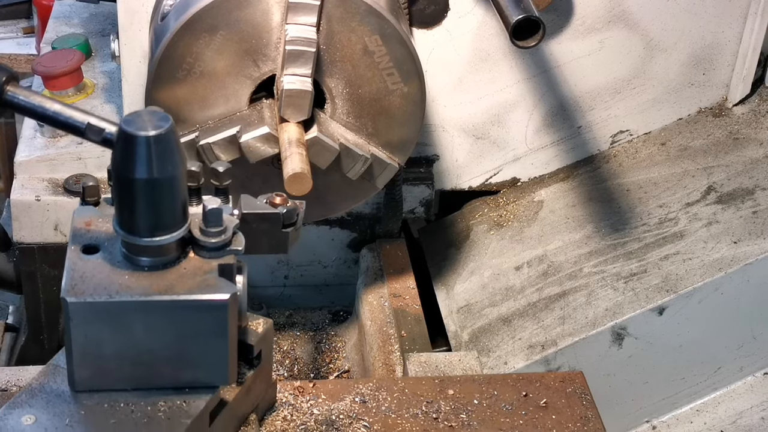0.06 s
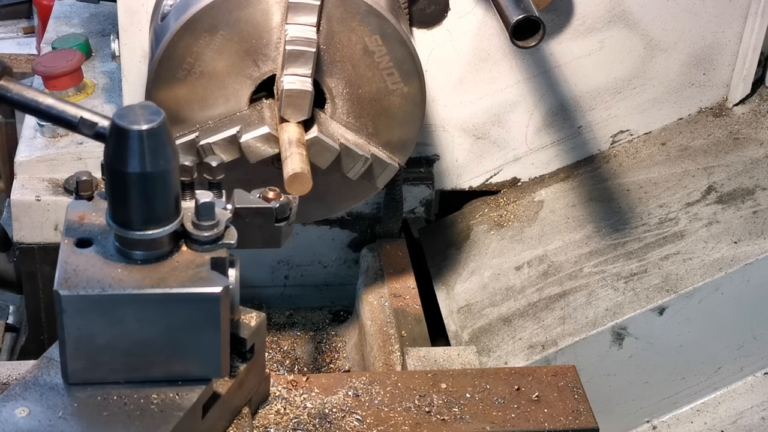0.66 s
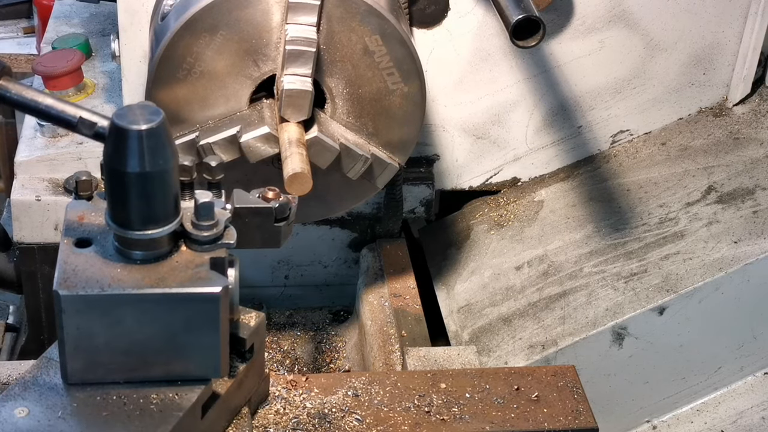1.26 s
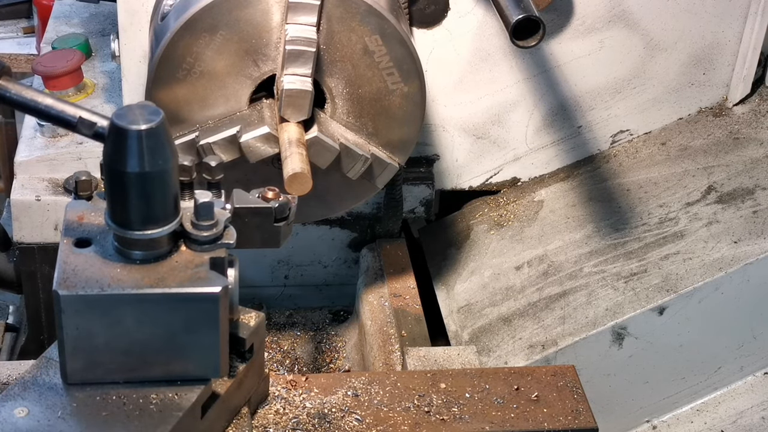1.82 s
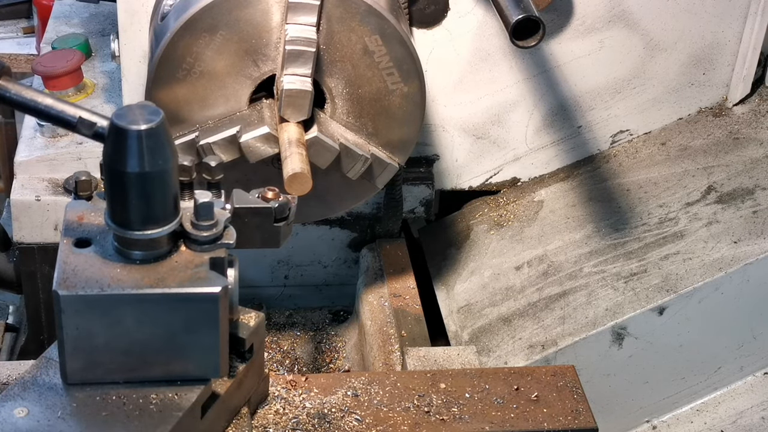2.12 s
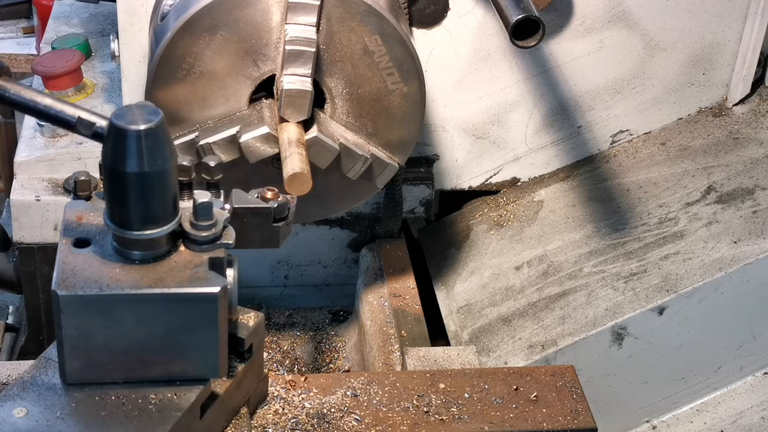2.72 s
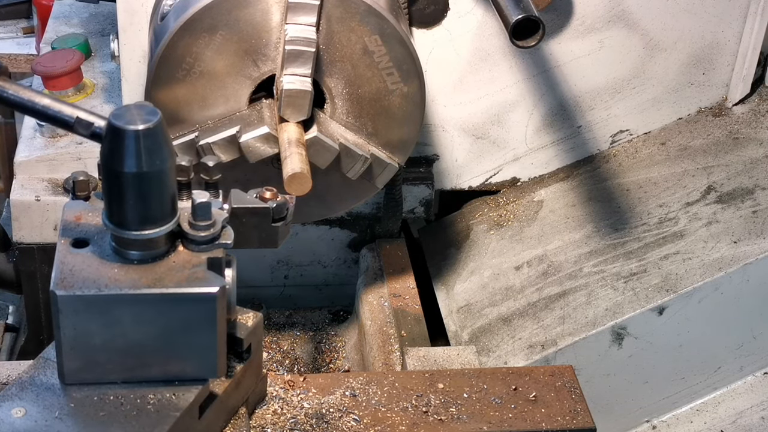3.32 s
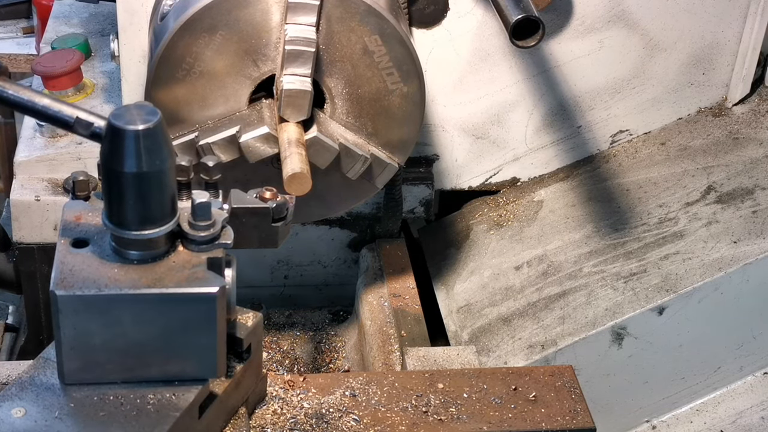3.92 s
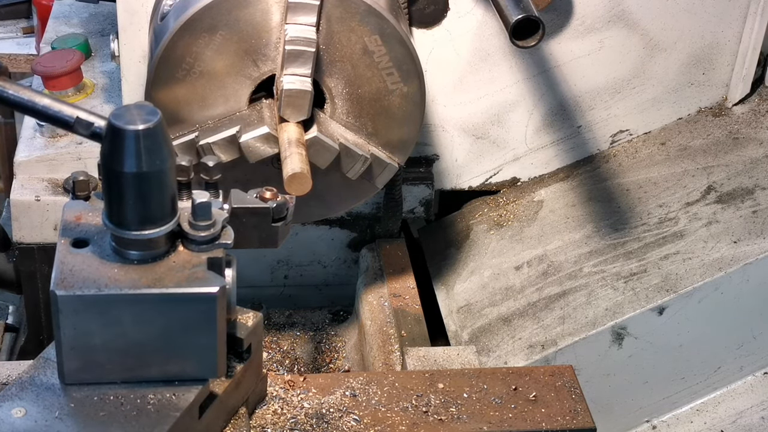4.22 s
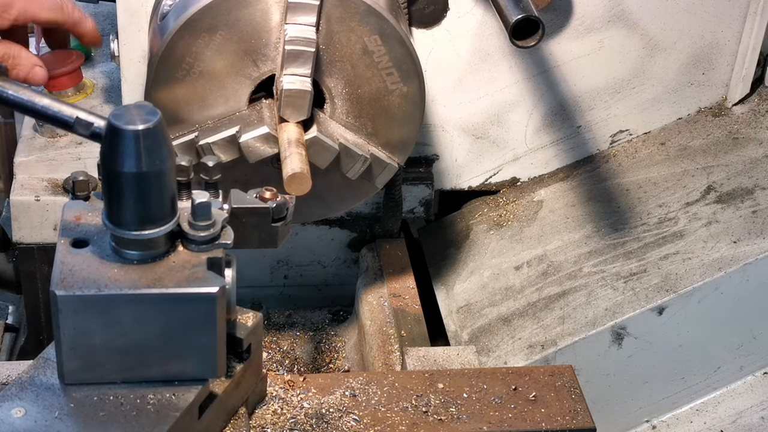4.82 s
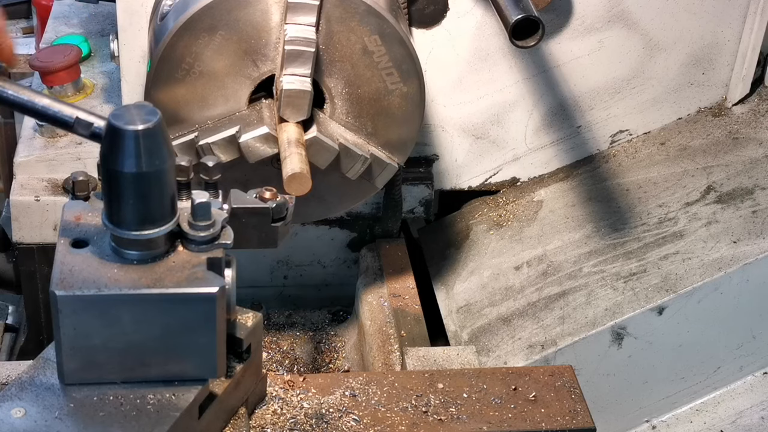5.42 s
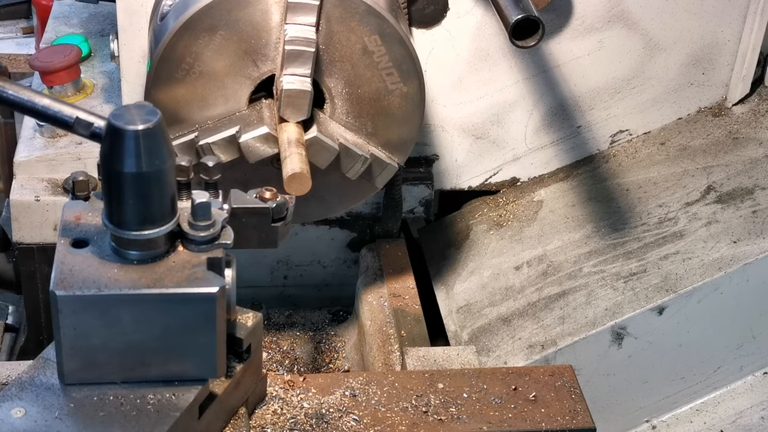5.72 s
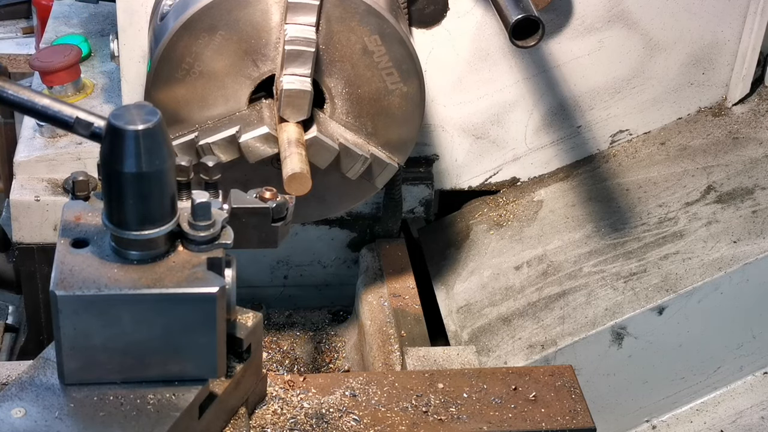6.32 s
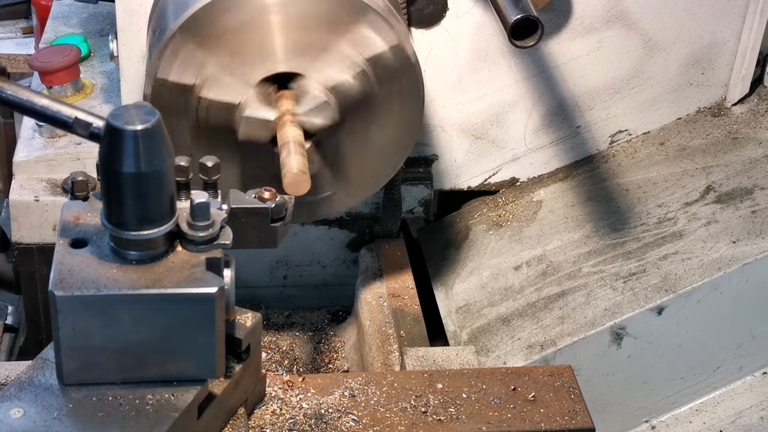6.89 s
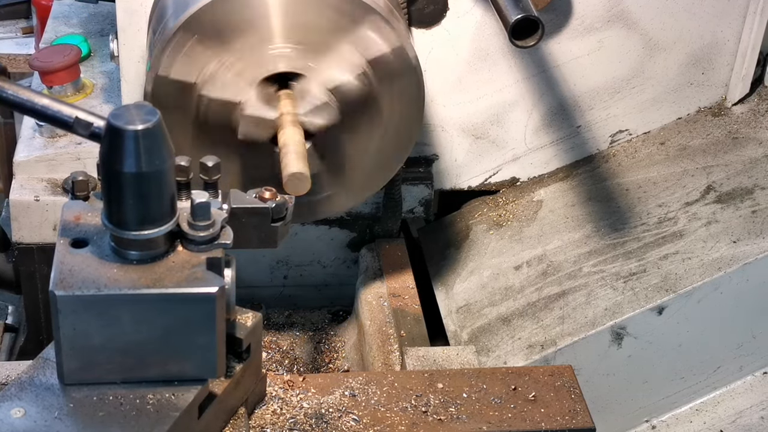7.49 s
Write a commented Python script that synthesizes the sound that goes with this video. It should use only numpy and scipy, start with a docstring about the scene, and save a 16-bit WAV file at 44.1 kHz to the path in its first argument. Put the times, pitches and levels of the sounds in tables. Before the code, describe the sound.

A small metal lathe is heard close up in an echoing workshop. Light steel clicks and a dull cabinet knock open the first second, with a sharp clack at about 1 second and a brief slide after it. Around 2 seconds, two taps ring the steel tool holder with a high ping. Softer clicks, slides and thuds follow from 3 to 4.5 seconds, with quiet gaps between them. At about 5.3 seconds a button releases with a clack and a thud, and a very faint electrical hum begins. A few small ticks come just after 6 seconds. At 6.5 seconds a switch snaps and the motor jolts up to speed with loud knocks and a short howl from the sheet-metal panels. The belt flaps and squeals briefly near 6.8 seconds. The lathe then runs steadily to the end, droning, with gears whining and rattling.

```python
"""Steel parts click and clack as a small metal lathe is set up, heard from just above its tool holder.
Each blow rings the steel, and knocks set the sheet-metal cabinet booming in an echoing workshop.
The stop button is released and a faint hum comes on. Then a power switch snaps, and at 6.5 s
the motor jolts up to speed: panels howl, the belt squeals briefly, and the gears whine and rattle."""
import sys
import numpy as np
from scipy import signal
from scipy.fft import rfft, irfft, next_fast_len
from scipy.io import wavfile

SR = 44100
rng = np.random.default_rng(int(sys.argv[2]) if len(sys.argv) > 2 else 0)


def put_to_file(sound):
    """Save the sound as 16-bit audio at rate SR, in the file named by the first command-line argument."""
    columns = np.atleast_2d(sound).T  # one column per channel
    safe = np.clip(columns, -1, 1)
    whole_steps = np.round(safe * 32767)
    wavfile.write(sys.argv[1], SR, whole_steps.astype(np.int16))


N = 332955
TIME = np.arange(N) / SR
RING_TIME = TIME[:SR + SR // 2]
START_S, RUN_UP_S, JOLT_RISE_S = 6.5, 0.147, 0.046   # the motor's start, and how quickly it gets going
TOOTH_HZ = 220.4   # gear teeth meeting each second at full speed

# how alike the two ears hear each pitch (1 = the same): pitch_hz, likeness
EAR_LIKENESS = [(60, 0.94), (300, 0.97), (600, 0.89), (1100, 0.8), (2200, 0.56), (4500, .1), (9000, 0.16)]


def clacks():
    """Steel hits steel and rings the tool holder. Returns the part that will echo and the close part."""
    # Here and below, fade_s is the time to fall by 60 dB; a higher tilt sounds brighter.
    # blows on steel parts: start_s, level_db, tilt_db_per_octave, fade_s, pitch_hz
    part_blows = [(0.083, -35.5, 2.5, 0.12, 5300), (.095, -33.5, 3.5, 0.24, 1750),
                  (0.275, -40.5, -7.5, 0.13, 4630), (0.5536, -54, -9, 0.041, 2300),
                  (0.594, -45, -7.5, 0.056, 2210), (0.6685, -47, -6, 0.12, 4640),
                  (0.7993, -45, -6.5, 0.082, 700), (0.9858, -14.5, 1.5, 0.028, 5980),
                  (1.004, -21, 0, 0.038, 1800), (1.52, -57, -6, 0.041, 3860),
                  (2.8969, -41.5, -4.5, 0.042, 5350), (3.478, -54.5, -7.5, 0.039, 2120),
                  (3.5129, -34.5, 5.5, 0.13, 2040), (4.2598, -29.5, 6, 0.057, 2040),
                  (4.473, -47.5, -3, 0.16, 2140), (5.247, -37, -7, 0.24, 1550),
                  (5.272, -26.5, -2.5, 0.13, 2270), (5.396, -28.5, -6.5, .12, 850),
                  (6.436, -32, 10, 0.16, 2950), (6.5194, -22, -3, 0.057, 2160),
                  (6.552, -32.5, 13, 0.068, 7650), (6.585, -21, -4, 0.095, 6900)]
    # blows on the tool holder: start_s, level_db, tilt_db_per_octave, fade_s, pitch_hz, ring_db
    holder_blows = [(1.9553, -29, 4, .08, 5180, 0.5), (2.1588, -24.5, 1, 0.12, 3100, 2.5),
                    (2.196, -33, -1, 0.11, 5200, -5)]
    # parts slide and settle: start_s, level_db, tilt_db_per_octave, fade_s, pitch_hz, boost_db
    slides = [(1.109, -41.5, 1.5, 0.106, 2860, 13), (1.177, -41, 1.5, 0.15, 2692, 7),
              (1.209, -28, -2.5, 0.049, 2080, 15), (3.028, -53, -0.5, 0.33, 3640, 4.5),
              (3.212, -52.5, -3, 0.16, 2230, 20), (3.824, -53, 2.5, 0.24, 2040, 14),
              (4.278, -34.5, -1, 0.16, 2090, 14.5), (4.731, -55, 7, 0.2, 1270, 17),
              (6.166, -45.5, -7, 0.16, 1850, 10)]
    # a light touch rings mostly the struck part, a hard blow the whole carriage: level_db, boost_db
    part_boost = [(-33, 13.5), (-13, 5.5)]
    # blows elsewhere ring the holder faintly, bright ones more
    other_blows = [(s, db, tilt, fade_s, hz, tilt - 21.5) for s, db, tilt, fade_s, hz in part_blows]
    cracks, rings = np.zeros((2, 2, N))
    for start_s, level_db, tilt_db, fade_s, hz, ring_db in holder_blows + other_blows:
        boost_db = np.interp(level_db, *np.transpose(part_boost))
        crack = carriage(start_s, 0.019 * fade_s, fade_s, tilt_db, hz, boost_db)
        add(cracks, start_s, from_db(level_db) * crack)
        add(rings, start_s, from_db(level_db + ring_db) * tool_holder())
    for start_s, level_db, tilt_db, fade_s, hz, boost_db in slides:
        add(cracks, start_s, from_db(level_db) * carriage(start_s, 0.012, fade_s, tilt_db, hz, boost_db))
    chatter_db = 3 * np.array([drift(70), drift(70)])   # the parts stay in touch, so the ring is uneven
    rings = rings * from_db(chatter_db)
    echo_share = from_db(-19)
    return cracks + echo_share * rings, (1 - echo_share) * rings


def carriage(start_s, rise_s, fade_s, tilt_db, hz, boost_db):
    """One blow sounds through the lathe's sliding carriage, strengthened at the struck part's pitch."""
    # tone colour of steel on steel: pitch_hz, level_db
    colour = [(100, -21.5), (400, -10), (700, -10), (1400, -1), (2500, 0), (3500, -4), (4800, -2.5),
              (6000, -5), (7600, -4.5), (8600, -15.5), (9400, -18.5), (10300, -30.5), (15000, -32)]
    # pitches the carriage strengthens: pitch_hz, width_hz, boost_db
    peaks = [(660, 47, 7.5), (1240, 160, 3.5), (1684, 180, -1), (2030, 250, -4.5), (3050, 780, 1.5),
             (4100, 300, 1), (5740, 400, 4)]
    # the hands move from the carriage to the switches: time_s, left_minus_right_db
    hands = [(0, -4.5), (1, -2.5), (2.2, -4), (4.3, -2), (6.4, 0)]
    struck_part = (hz, 0.19 * hz, boost_db)
    side_db = np.interp(start_s, *np.transpose(hands))
    return pan(side_db) * blow(colour, rise_s, fade_s, tilt_db, peaks + [struck_part])


def tool_holder():
    """The steel tool holder rings once, sending each note out in its own direction."""
    # its natural notes: pitch_hz, level_db, fade_s
    notes = [(1700, -30, .6), (2530, -20, .18), (3050, -27, .55), (3860, -26, .25), (5254, 0, .12),
             (5262, -10, .34), (5298, -11, .15), (5600, -15, .15), (8845, -17, .22), (9195, -15, .22),
             (13360, -23, .19)]
    # where they are heard: pitch_hz, left_minus_right_db
    sides = [(2500, -3.5), (5300, -11.5), (9000, -0.5), (13400, 1.5)]
    return sum(pan(at_hz(sides, note[0])) * ringing([note], spread_db=2) for note in notes)


def knocks():
    """Dull thuds on the cabinet, and the boom they leave in its thin panels."""
    # each knock: start_s, level_db, tilt_db_per_octave, fade_s
    hits = [(0, -52.5, 0, .8), (0.094, -34, 4, 0.55), (0.389, -52, 4.5, 0.64), (0.799, -56, 5, 0.98),
            (1.03, -51.5, -2, 0.32), (2.897, -55, 2.5, 0.51), (3.22, -49.5, -7, 0.41),
            (3.547, -35, 0.5, 0.3), (3.835, -47.5, -1, 0.23), (4.276, -49, -3, 0.41),
            (4.487, -45.5, -5, 0.28), (4.999, -59.5, 2.5, 0.79), (5.277, -24, -2, 0.22),
            (5.398, -35.5, 1.5, 0.24), (6.477, -33, 5, 0.19), (6.53, -17.5, 3.5, 0.35),
            (6.587, -16, 3, 0.19)]
    # tone colour of a thud: pitch_hz, level_db
    colour = [(30, -55), (70, -7.5), (120, -5), (200, -0.5), (320, -7.5), (500, -3.5), (900, -12),
              (1600, -18.5), (3000, -30.5), (8000, -50), (16000, -76.5)]
    # natural notes of the panels: pitch_hz, level_db, fade_s
    panels = [(85.7, -8.5, 3.4), (134.8, 2, 0.7), (223.8, -4.5, 3), (249, -3, 1.9), (282, 6.5, 0.98),
              (362.5, -6, 1), (477, 0.5, 0.86), (762, -6, 1.1), (846, -13.5, 1.3), (1046, -19, 1.1)]
    thuds, booms = np.zeros((2, 2, N))
    for start_s, level_db, tilt_db, fade_s in hits:
        gain = from_db(level_db) * pan(-1.5)
        add(thuds, start_s, gain * blow(colour, rise_s=0.038 * fade_s, fade_s=fade_s, tilt_db=tilt_db))
        add(booms, start_s, gain * from_db(-18.5) * ringing(panels, spread_db=0.5))
    return thuds, booms


def ticks():
    """Handles and switches click lightly, each leaving one high ping."""
    # each click: start_s, level_db, pitch_hz, ring_db
    hits = [(0.0264, -39, 7600, -16), (0.224, -44, 7350, -14), (0.3611, -35.5, 7400, -42),
            (0.6235, -49.5, 7000, -23), (6.0304, -53, 7120, -1), (6.1336, -34.5, 7100, -1.5),
            (6.438, -28.5, 7200, -24)]
    # tone colour of a click: pitch_hz, level_db
    colour = [(200, -21.5), (1000, -13.5), (1900, -4), (2600, -8), (3500, -6.5), (4600, -11), (6200, -4.5),
              (7400, 1.5), (8500, -40.5), (11500, -33), (15000, -44)]
    clicks, pings = np.zeros((2, 2, N))
    for start_s, level_db, hz, ring_db in hits:
        gain = from_db(level_db) * pan(-2.2)
        add(clicks, start_s, gain * blow(colour, rise_s=0.0004, fade_s=0.039, peaks=[(hz, 250, 9)]))
        add(pings, start_s, gain * from_db(ring_db) * ringing([(hz, 0, 0.13)], spread_db=4))
    return clicks, pings


def gears(speed):
    """Meeting teeth whine, rumble and rattle in their housing: shaken at the start, louder with speed."""
    # tone colour of the gear noise: pitch_hz, level_db
    colour = [(25, -28), (55, -11), (90, -9), (180, -4.5), (300, -2), (500, -7), (800, -4.5), (1300, -8.5),
              (2400, -8.5), (3300, -14.5), (4500, -19.5), (5800, -18), (7800, -26), (9300, -46),
              (15000, -55)]
    # pitches the housing strengthens: pitch_hz, width_hz, boost_db
    peaks = [(176, 7.8, 12.5), (668, 55, 10.5), (704, 40, -5.5), (913, 12, 7.5), (994, 21, 7.5),
             (1090, 17, 7.5), (1343, 55, 5), (1520, 70, 3), (1784, 64, 5), (2010, 30, 11), (2200, 49, -1),
             (2480, 37, 9.5), (2610, 52, 3), (2880, 100, 5.5), (3070, 53, 9)]
    # notes of the whine: multiple_of_tooth_rate, level_db
    overtones = [(1, -32), (2, -34), (3, -45), (4, -42), (5, -52), (6, -40), (7, -52), (8, -47), (9, -39),
                 (10, -52), (11, -48)]
    teeth = np.cumsum(TOOTH_HZ * speed) / SR   # how many have met so far
    running_s = np.maximum(TIME - START_S, 0)
    jolt_rise = np.minimum(running_s / JOLT_RISE_S, 1) ** 2
    jolt = jolt_rise * fade(np.maximum(running_s - JOLT_RISE_S, 0), fade_s=0.42)
    housing = noise(colour, N, peaks=peaks)
    low = signal.sosfiltfilt(signal.butter(2, 1300, fs=SR, output="sos"), housing)
    # every tooth lands as a small burst, no two equally hard
    bursts = rms_one(from_db(0.56 * np.cos(2 * np.pi * teeth) + 0.28 * drift(60)))
    rattle = (from_db(-32) * speed ** 13 + from_db(-25) * jolt) * rms_one(housing - low) * bursts
    rumble = np.hypot(from_db(-31) * speed ** 0.34, from_db(-26) * jolt) * rms_one(low)
    whine = sum(from_db(db) * tone(multiple * teeth, multiple * TOOTH_HZ, rough=0.3, flutter_hz=10)
                for multiple, db in overtones)
    return rumble * pan(-1.4) + speed ** 12 * whine * pan(-2) + rattle * pan(-4.5)


def motor(speed):
    """The motor and belt drone on set pitches, louder as the speed rises."""
    # notes of the drone: pitch_hz, level_db
    notes = [(100, -38), (129.4, -44.5), (148.8, -38.5), (200, -39), (300.5, -48.5), (761.5, -36.5),
             (2229, -50.5)]
    drone = sum(from_db(db) * tone(hz * TIME, hz, rough=0.34, flutter_hz=3.7) for hz, db in notes)
    return speed * drone * pan(-1.4)


def shudders():
    """The rising speed shakes one panel after another into a short howl."""
    # each panel's howl: pitch_hz, level_db, fade_s
    panels = [(245.7, -26, 0.3), (278.5, -34, 2.2), (323.5, -23, 0.36), (428.3, -29.5, 1.34),
              (611, -28, 0.78), (738, -25, 1.16), (847, -27, 2.23)]
    top_shake_hz = 4.8 * TOOTH_HZ
    howls = 0
    for hz, level_db, fade_s in panels:
        reached_s = START_S + RUN_UP_S * np.arctanh(min(hz / top_shake_hz, 0.99))
        swell = from_db(level_db) * flare(reached_s, rise_s=0.024, fade_s=fade_s)
        howls = howls + swell * tone(hz * TIME, hz, rough=0.44, flutter_hz=22)
    return howls * pan(-2.9)


def belt():
    """Near full speed the belt slips, with one low flap and a short scraping squeal."""
    # tone colour of the squeal: pitch_hz, level_db
    colour = [(800, -50), (1500, -35), (1720, -6), (2100, -25), (2950, -5), (3450, 0), (3750, -3),
              (4400, -28), (9000, -60)]
    flap_hz = 186.1
    flap_note = tone(flap_hz * TIME, flap_hz, rough=0.26, flutter_hz=20)
    flap = from_db(-19) * flare(peak_s=6.815, rise_s=0.0071, fade_s=0.1) * flap_note
    squeal = from_db(-31) * flare(peak_s=6.85, rise_s=0.019, fade_s=0.23) * noise(colour, N)
    return flap * pan(-2.2) + squeal * pan(-2.5)


def controls(power_on_s):
    """The electrical controls hum thinly once the power is on."""
    # notes of the hum: pitch_hz, level_db
    notes = [(600, -72), (900, -85), (1001, -68.5), (1100, -77)]
    hum = sum(from_db(db) * np.sin(2 * np.pi * hz * TIME) for hz, db in notes)
    return hum * np.clip((TIME - power_on_s) / 0.02, 0, 1)


def workshop_echo(sound):
    """The room's echo builds within a few milliseconds and lasts longest in the bass."""
    # length of the echo: pitch_hz, fade_s
    lengths = [(100, 3.5), (400, 0.98), (1500, 0.5268), (3000, 0.494), (6000, 0.4059), (12000, 0.58)]
    # its strength against the direct sound: pitch_hz, level_db
    levels = [(100, -1), (500, 0.96), (2000, 1), (6000, 0.24), (12000, -2)]
    t = TIME[:SR]
    hiss = noise([(20, 0), (20000, 0)], len(t))
    edges_hz = np.geomspace(50, 16000, num=10)
    echo = 0
    for low, high in zip(edges_hz, edges_hz[1:]):
        hz = np.sqrt(low * high)
        shape = fade(t, at_hz(lengths, hz)) * (1 - np.exp(-t / 0.0016))
        band = signal.sosfilt(signal.butter(2, [low, high], "band", fs=SR, output="sos"), hiss)
        echo = echo + band * from_db(at_hz(levels, hz)) * shape / np.linalg.norm(shape)
    return signal.fftconvolve(sound, echo, axes=1)[:, :N]


def workshop_air():
    """A very faint, low rush fills the room."""
    # its tone colour: pitch_hz, level_db
    colour = [(25, -11), (40, -6), (60, -5), (79, 0), (105, -5), (200, -7), (500, -13), (1000, -17),
              (3000, -22), (7500, -29), (9500, -41), (15000, -47)]
    return from_db(-68.5) * noise(colour, N)


def blow(colour, rise_s, fade_s, tilt_db=0, peaks=()):
    """A hit starts many brief vibrations that blur into noise; a soft touch builds up more slowly."""
    t = TIME[:SR // 2]
    burst = noise(colour, len(t), tilt_db, peaks) * (1 - np.exp(-t / rise_s)) * fade(t, fade_s)
    return np.pad(burst, [(0, 0), (0, len(RING_TIME) - len(t))])


def ringing(notes, spread_db):
    """Struck metal rings on at its natural notes, with new strengths at every hit."""
    out = np.zeros((2, len(RING_TIME)))
    for hz, level_db, fade_s in notes:
        t = RING_TIME[:int(fade_s * SR)]
        offset = rng.choice([-1, 1]) * ear_offset(hz)
        gain = from_db(level_db - spread_db * rng.normal())
        swell = 1 - np.exp(-hz * t / 4)   # a note needs a few cycles to get going
        out[:, :len(t)] += gain * swell * fade(t, fade_s) * np.sin(2 * np.pi * hz * t + offset)
    return out


def tone(cycles, hz, rough, flutter_hz):
    """A note whose loudness and pitch flutter."""
    phase = 2 * np.pi * (cycles + rng.random()) + rough * drift(flutter_hz)
    return np.sqrt(2) * (1 + rough * drift(flutter_hz)) * np.sin(phase + ear_offset(hz))


def noise(colour, size, tilt_db=0, peaks=()):
    """Stereo noise with a tone colour, a tilt per octave and peaks; the bass is alike in both ears."""
    padded = next_fast_len(size, True)
    hz = np.maximum(np.fft.rfftfreq(padded, 1 / SR), 1)
    level_db = at_hz(colour, hz) + tilt_db * np.log2(np.clip(hz, 100, 10000))
    for centre_hz, width_hz, boost_db in peaks:
        level_db = level_db + boost_db / (1 + (2 * (hz - centre_hz) / width_hz) ** 2)
    alike = at_hz(EAR_LIKENESS, hz)
    mid, side = rfft(rng.standard_normal((2, padded)))
    ears = np.sqrt(1 + alike) * mid + np.sqrt(1 - alike) * side * [[1], [-1]]
    return rms_one(irfft(ears * from_db(level_db), padded)[:, :size])


def drift(rate_hz):
    """A smooth random wobble, about 1 in size."""
    step, warm_up = 40, 2000
    memory = np.exp(-2 * np.pi * rate_hz * step / SR)
    chance = rng.standard_normal(N // step + warm_up + 2)
    slow = signal.lfilter([1], [1, -2 * memory, memory ** 2], chance)[warm_up:]
    return np.interp(np.arange(N) / step, np.arange(len(slow)), rms_one(slow))


def ear_offset(hz):
    """High notes reach the two ears out of step, by this angle in radians."""
    return np.arccos(at_hz(EAR_LIKENESS, hz)) * np.array([[0], [1]])


def flare(peak_s, rise_s, fade_s):
    """Swells to a peak, then dies away."""
    swell = np.exp(-(np.minimum(TIME - peak_s, 0) / rise_s) ** 2 / 2)
    return swell * fade(np.maximum(TIME - peak_s, 0), fade_s)


def fade(t, fade_s):
    """Falls by 60 dB in fade_s seconds."""
    return np.exp(-np.log(1000) * t / fade_s)


def from_db(db):
    """Turns decibels into a multiplier."""
    return 10 ** (np.asarray(db) / 20)


def rms_one(sound):
    """Scales a sound to an average strength (rms) of 1."""
    return sound / np.sqrt(np.mean(sound ** 2) + 1e-20)


def at_hz(table, hz):
    """Reads a table's value at any pitch, sliding between its rows."""
    pitches, values = np.transpose(table)
    return np.interp(np.log(hz), np.log(pitches), values)


def pan(db):
    """Left and right gains; below 0 dB the sound leans right."""
    return from_db(np.array([[db], [-db]]) / 2)


def add(out, start_s, sound):
    """Mixes a sound in from a given time."""
    start = round(start_s * SR)
    out[:, start:start + sound.shape[-1]] += sound[..., :N - start]


def scene():
    """The blows echo around the workshop; ringing metal and the running lathe are heard close by."""
    blows, rings = np.sum([clacks(), ticks(), knocks()], axis=0)
    # share of full speed: the motor pulls hard from rest, then levels off
    speed = np.tanh(np.maximum(TIME - START_S, 0) / RUN_UP_S)
    switched_on = np.clip((TIME - START_S) / JOLT_RISE_S, 0, 1)
    lathe = switched_on * (shudders() + gears(speed) + motor(speed) + belt())
    air = workshop_air()
    return blows + workshop_echo(blows) + rings + lathe + controls(power_on_s=5.4) + air


def record(dry):
    """The high treble leans to the left, and everything above 15400 Hz is cut steeply."""
    sheen = signal.sosfilt(signal.butter(1, [7000, 9000], "band", fs=SR, output="sos"), dry)
    ears = dry + sheen * np.array([[0.45], [-0.35]])
    return signal.sosfilt(signal.ellip(10, 0.1, 80, 15400, fs=SR, output="sos"), ears)


dry = scene()
out = record(dry)
put_to_file(out)
```